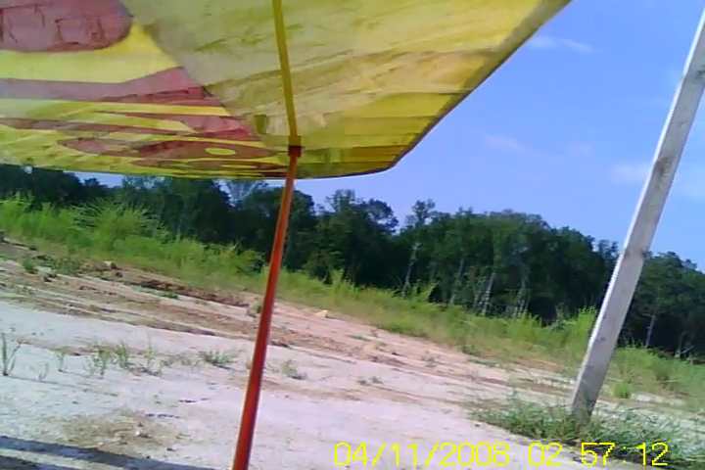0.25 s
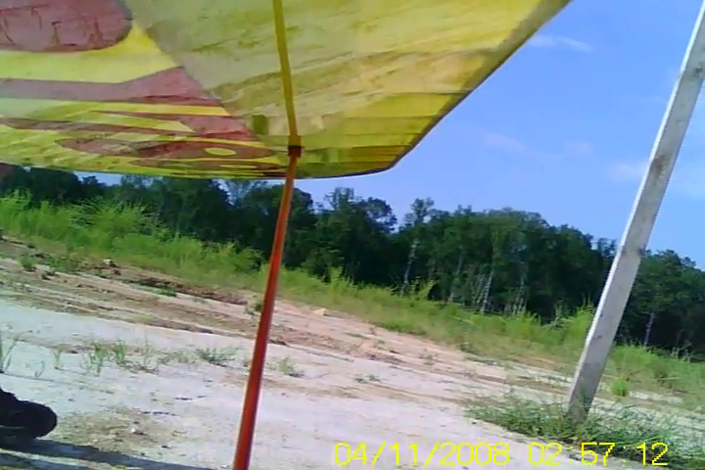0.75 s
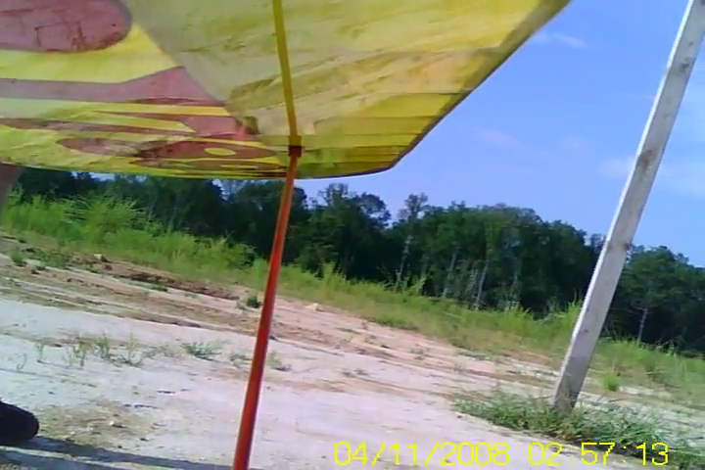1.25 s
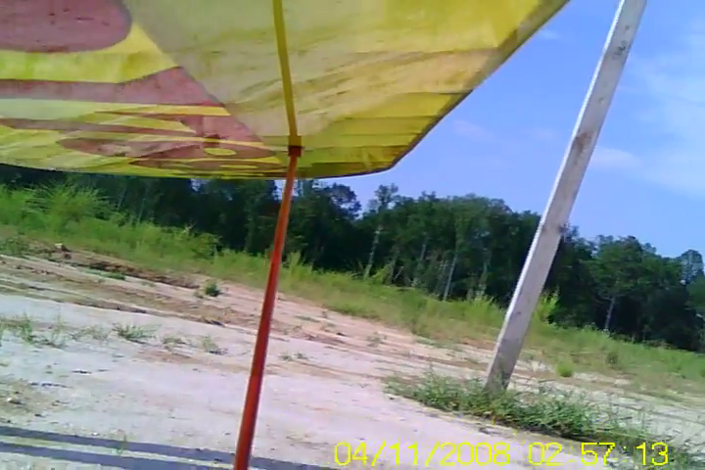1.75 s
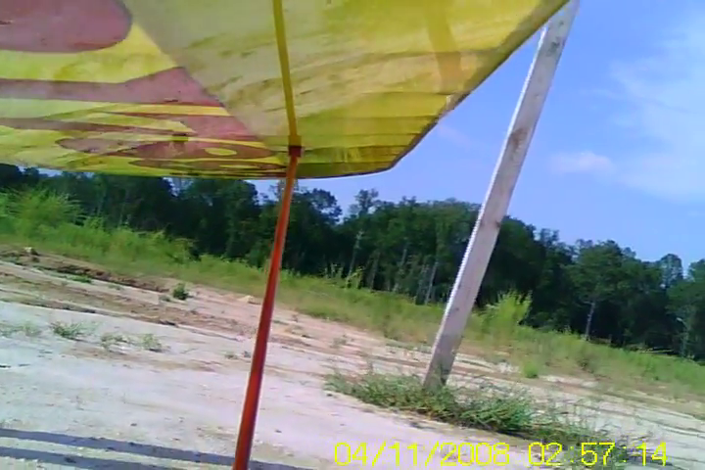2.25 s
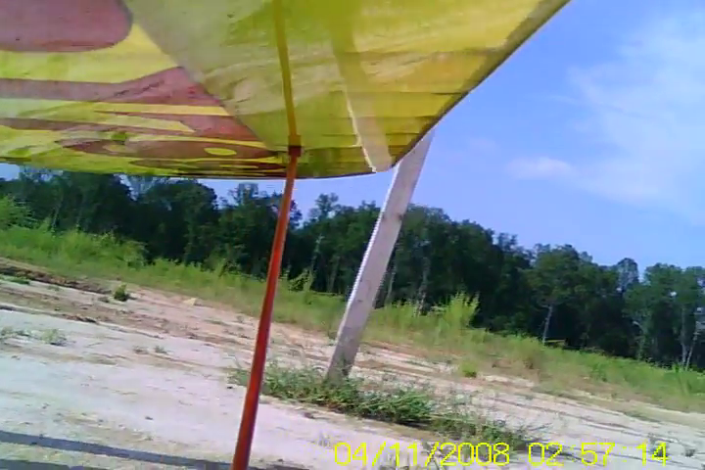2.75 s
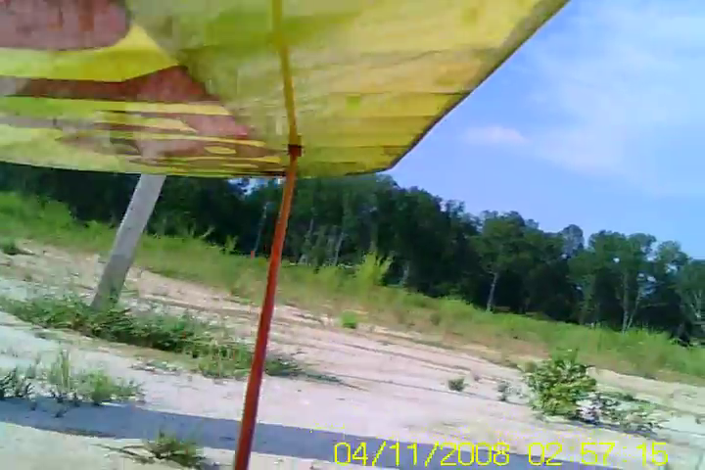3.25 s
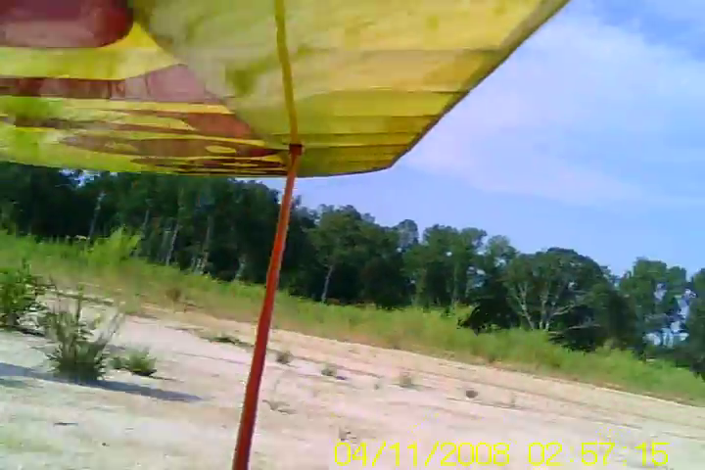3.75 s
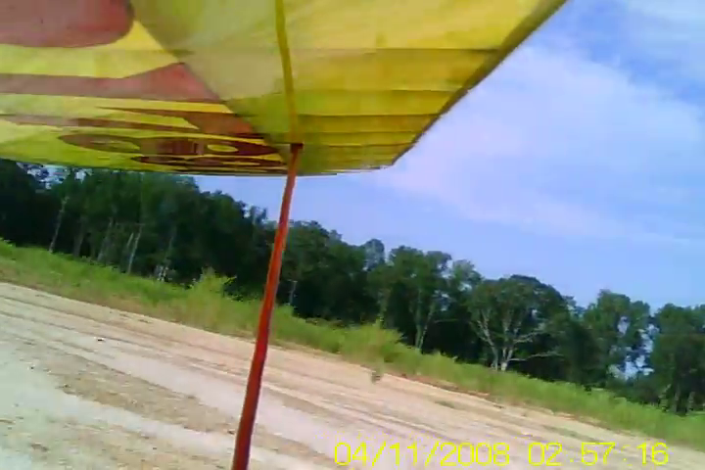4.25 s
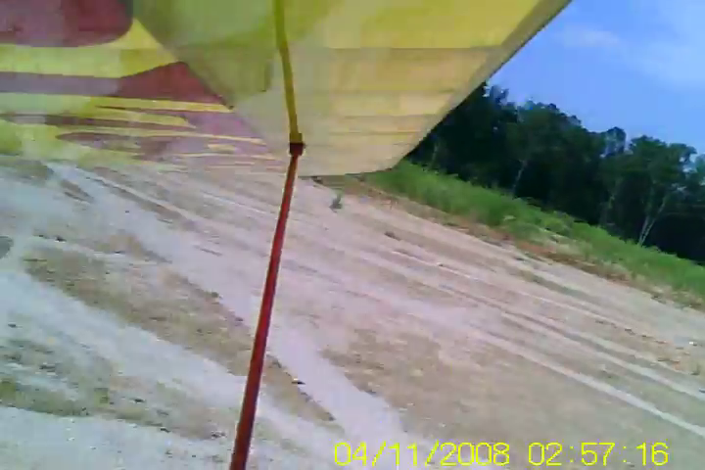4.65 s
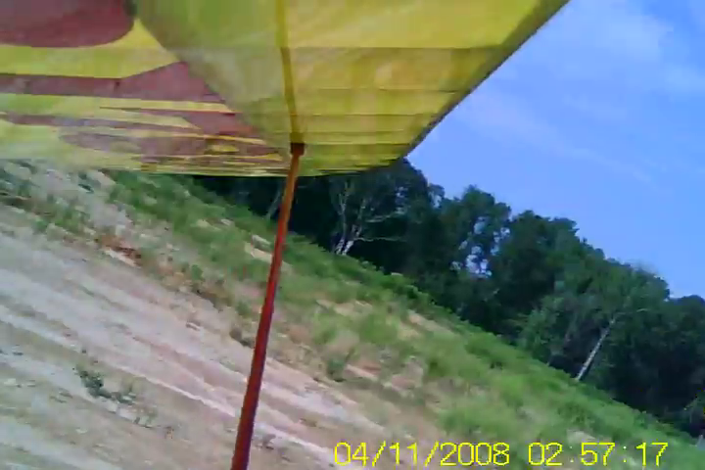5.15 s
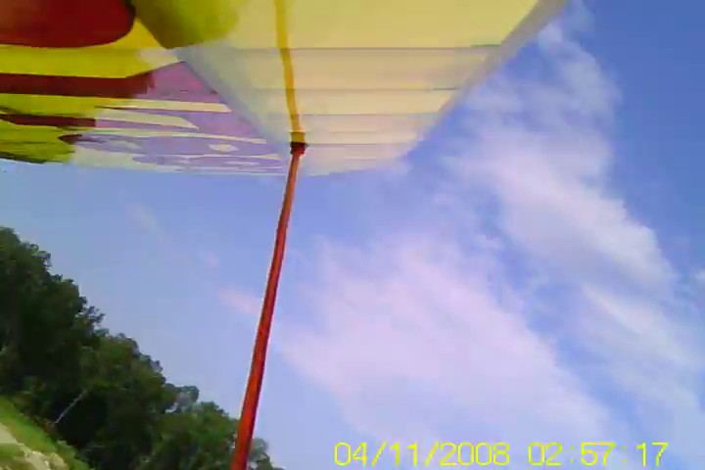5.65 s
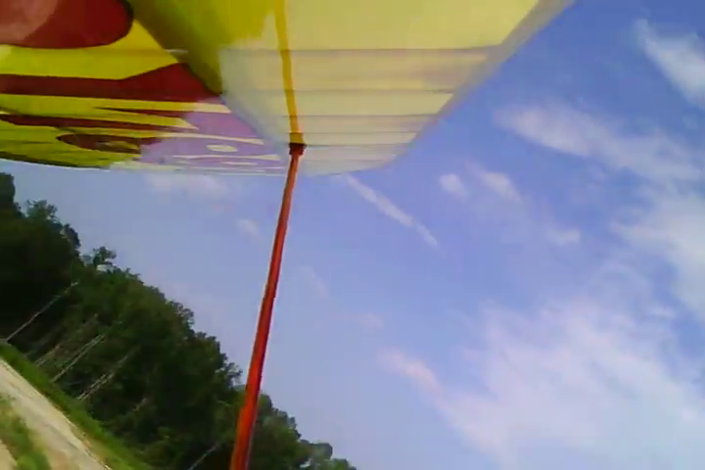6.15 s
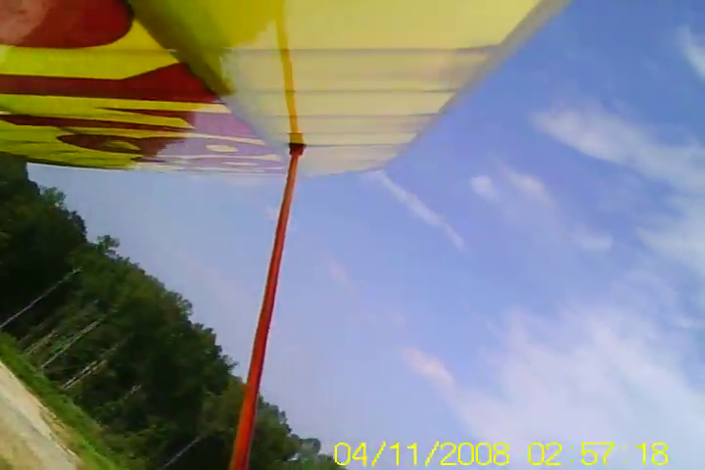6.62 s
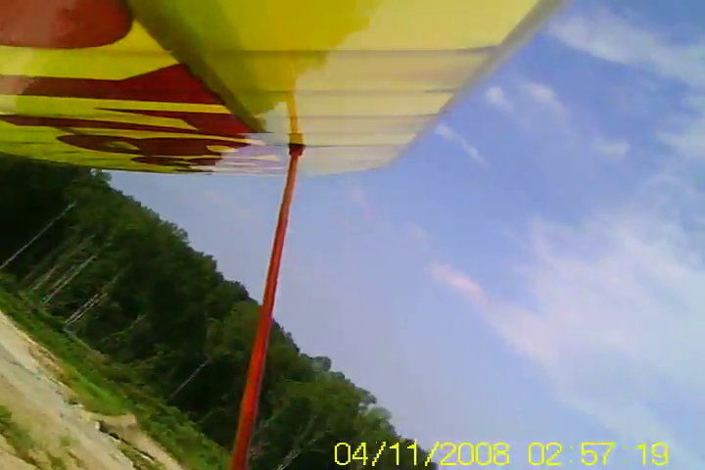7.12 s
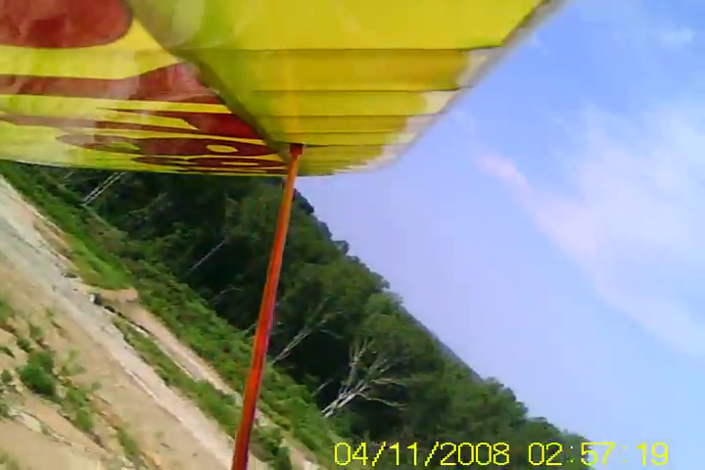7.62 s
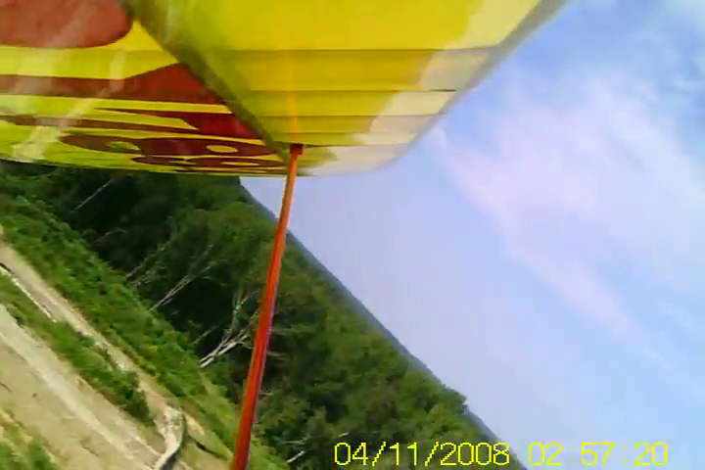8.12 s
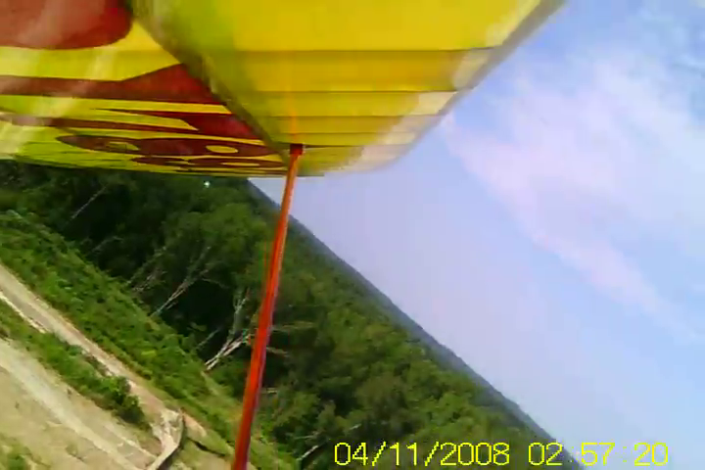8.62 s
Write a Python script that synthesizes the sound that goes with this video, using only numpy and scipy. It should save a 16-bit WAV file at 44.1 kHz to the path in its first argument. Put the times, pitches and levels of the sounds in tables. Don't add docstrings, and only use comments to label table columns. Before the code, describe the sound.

Small electric motor spins up in open air, very quiet at first with a high whine, rattle and peep. Wash from the propeller then buffets the close onboard microphone, with slaps, rumble and gliding squeals. After a short drop it builds to full throttle: dense distorted wind, thudding suction pops and a buzzing low hum, slightly softer and uneven towards the end.

```python
import sys
import numpy as np
from scipy import signal
from scipy.fft import rfft, irfft
from scipy.io import wavfile
from scipy.ndimage import uniform_filter1d

SR = 44100
rng = np.random.default_rng(int(sys.argv[2]) if len(sys.argv) > 2 else 0)


def int16_out(signal):
    q = np.round(np.clip(np.atleast_2d(signal).T, -1, 1) * 32767)
    wavfile.write(sys.argv[1], SR, q.astype(np.int16))


def boost_factor(decibels):
    exponent = np.asarray(decibels, float) / 20
    return 10 ** exponent


N = 391608
T = np.arange(N) / SR
F = np.fft.rfftfreq(N, 1 / SR) + 1e-3
FULL_POWER_S, HANDOVER_S = 3.14, 0.15


def curve(rows):
    s, *columns = np.transpose(rows)
    return [np.interp(T, s, c) for c in columns]


def shape(points):
    hz, db = np.transpose(points)
    return np.interp(np.log(F), np.log(hz), db, left=-120, right=-120)


def unit(x):
    return x / np.sqrt(np.mean(x ** 2))


def walk(rate):
    k = int(SR / rate)
    held = np.repeat(rng.standard_normal(N // k + 1), k)
    return unit(uniform_filter1d(uniform_filter1d(held, k), k)[:N])


def tone(hz):
    return np.sqrt(2) * np.sin(2 * np.pi * (np.cumsum(hz) / SR + rng.random()))


def noise(weight):
    return irfft(rfft(rng.standard_normal(N)) * weight, N)


WASH_HZ = [45, 420, 1500, 4500]
# f/Hz, level/dB per Hz
LOW_COLOUR = [(7.1, -41), (12, -14), (48, 0), (126, -2.5), (213, -6.5), (249, -7), (582, -13), (1590, -20),
              (2200, -38.5), (2860, -71), (4840, -120)]
# f/Hz, level/dB per Hz
PORT_COLOUR = [(1060, 6), (1800, 4), (2400, -7), (3040, -9.5), (3620, -10), (4860, -23.5), (6170, -17),
               (7180, -24), (7770, -23.5), (8680, -17.5), (10100, -28), (12000, -46.5), (15600, -79),
               (22000, -120)]
PORT_DB = -26
# f/Hz, level/dB
SLOW_AIR = [(45, -2), (90, -1.5), (150, -3), (300, -0.5), (500, 1.5), (800, 2.5), (1100, 1.5), (1600, -3.5),
            (2200, -2), (3500, 1), (9000, -0.5)]


def wash(eddy_db=1.98, own_db=0.2, knee_hz=350):
    colour = np.hypot(boost_factor(shape(LOW_COLOUR)), boost_factor(shape(PORT_COLOUR) + PORT_DB))
    spectrum = rfft(rng.standard_normal(N)) * colour
    levels = ranges()
    for k, (low, high) in enumerate([(18, 110), (250, 700), (1100, 2000), (2500, 7500)]):
        inside = (F > low) & (F < high)
        levels[k] -= 10 * np.log10(2 * np.sum(abs(spectrum[inside]) ** 2) / N ** 2)
    flicker = walk(90)
    part_power = np.clip((FULL_POWER_S - T) / .1, 0, 1)
    shared = eddy_db * walk(400) + bursts()
    shared += (0.64 + 0.4 * part_power) * turns()
    shared -= 10 * np.log10(np.mean(boost_factor(2 * shared)))
    air_hz, air_db = np.transpose(SLOW_AIR)
    out = 0
    for hz in 2 ** np.arange(3.5, 14, .5):
        window = np.cos(np.pi * np.clip(np.log2(F / hz), -.5, .5)) ** 2
        place = np.interp(np.log(hz), np.log(WASH_HZ), np.arange(4))
        k = min(int(place), 2)
        db = levels[k] + (place - k) * (levels[k + 1] - levels[k])
        db = db + shared * hz / (hz + knee_hz)
        db = db + own_db * np.roll(flicker, rng.integers(N))
        db = db + part_power * np.interp(np.log(hz), np.log(air_hz), air_db)
        out = out + boost_factor(db) * irfft(spectrum * window, N)
    return out


# t/s, flow level/dB
FLOW = [(0, -62), (.11, -68), (.14, -59), (.42, -51), (.5, -44), (.57, -31), (.74, -31), (1.33, -26.5),
        (1.7, -37.5), (2.3, -36.5), (2.45, -31), (2.75, -26), (3.17, -27), (3.27, -21), (4.5, -25.5),
        (5, -23), (7.4, -29), (8.88, -28.5)]
# flow/dB, rumble/dB, roar/dB, hiss/dB
WASH_LAW = [(-65.5, -59, -63, -70), (-57.5, -27, -41.5, -73), (-48, -44, -31, -53), (-35.5, -24, -27, -51),
            (-28.5, -19, -24, -43.5), (-21.5, -16, -20, -38)]
FULL_POWER_DB = [-0.5, 0, 0.5, 6]
SWELL_SHARE = [1, 0.095, 0.1, 0.067]


def ranges():
    flow = curve(FLOW)[0]
    at, *law = np.transpose(WASH_LAW)
    rumble, roar, hiss = (np.interp(flow, at, db) for db in law)
    full = np.clip((T - FULL_POWER_S) / HANDOVER_S, 0, 1)
    levels = np.array([rumble, roar, flow, hiss])
    return levels + np.outer(FULL_POWER_DB, full) + np.outer(SWELL_SHARE, swells())


# t/s, level/dB, half length/s
SWELLS = [(.17, -1.5, 0.098), (0.647, 2, 0.11), (1.116, 4, 0.069), (1.338, 6, .04), (1.636, -1.5, .1),
          (2.203, 5, 0.07), (2.45, -6.5, 0.15), (2.62, 3.5, 0.045), (2.737, 8.5, 0.016), (2.945, 4, 0.086),
          (3.276, 4, 0.077), (3.82, -3, 0.17), (4.06, -1, 0.17), (4.31, 0, 0.028), (4.475, -3, 0.043),
          (4.62, 1.5, 0.064), (4.8, -5, .06), (4.948, 4, 0.039), (5.119, -4, 0.057), (5.243, -0.5, .06),
          (5.487, -10, .18), (5.728, -1, 0.063), (6.08, -1, .08), (6.4, 1, 0.1), (6.565, 5.5, 0.043),
          (6.877, 6, 0.16), (7.12, 2, 0.07), (7.36, 6, 0.058), (7.57, 4.5, 0.052), (8.72, 2.5, 0.037)]


def swells():
    t = T[::64]
    swell = sum(db * np.exp(-((t - s) / half_s) ** 2) for s, db, half_s in SWELLS)
    return np.interp(T, t, swell)


def turns():
    hz = np.where(T < FULL_POWER_S, curve(SHAFT)[0], curve(BLADE)[0])
    return np.cos(2 * np.pi * np.cumsum(hz) / SR)


# t/s, peak level/dB, ring f/Hz
SLAPS = [(0.543, 1, 816), (0.891, -7, 681), (0.972, 2, 743), (1.06, 4, 670), (1.118, 7, 627),
         (1.184, 2, 1120), (1.211, 9, 646), (1.235, -1, 851), (1.262, 3, 1100), (1.29, 0, 1240),
         (1.309, 2, 1200), (1.337, 1, 724), (2.178, 0, 654), (2.397, 2, 670), (2.417, -1, 883),
         (2.722, 3.5, 1210), (2.884, 3, 1410), (3.425, 2.5, 1150), (4.117, -1, 680), (4.424, 2.5, 1220),
         (4.57, -20, 614), (4.587, 8, 672), (4.968, 3, 829), (6.393, -4, 644), (7.019, 4, 666),
         (7.254, 5, 880), (7.276, -4, 641), (7.335, -2, 802), (7.507, 2, 1520), (8.679, -4, 697)]


def slaps(t60=0.0077, trim_db=-3):
    out, t = np.zeros(N + 2048), np.arange(2048) / SR
    envelope = boost_factor(-60 * t / t60) * (1 - np.exp(-t / 0.00072))
    for s, db, hz in SLAPS:
        i = int(s * SR)
        out[i:i + 2048] -= boost_factor(db + trim_db) * np.sin(2 * np.pi * hz * t) * envelope
    return out[:N]


def bursts(rise_s=0.0011, fall_s=0.0035, share=0.26):
    kicks, t = np.zeros(N), np.arange(2048) / SR
    s, db, _ = np.transpose(SLAPS)
    kicks[(s * SR).astype(int)] = share * np.clip(db + 24, 0, 30)
    swell = np.exp(-t / fall_s) * (1 - np.exp(-t / rise_s))
    return signal.fftconvolve(kicks, swell)[:N]


# t/s, peak level/dB
DIPS = [(2.73, -5), (3.046, -2), (3.3035, -3.5), (3.36, -3), (3.4036, 4), (3.546, 0), (3.5707, -2.5),
        (4.191, 1), (4.2433, -4.5), (4.2597, 1.5), (4.4248, -3), (4.518, 1.5), (4.6414, -2.5), (4.6548, -2),
        (4.6867, -2), (4.936, -15), (4.9548, -1), (4.969, -5), (5.127, 0), (6.1899, 1.5), (6.2747, -6),
        (6.8001, -2), (6.832, -8), (6.8809, -5), (7.1447, -2), (7.1673, 2), (7.2553, 3), (7.481, -1),
        (7.5737, -7), (8.0811, 1)]
SMALL_DIPS, SMALL_DIP_DB = 22, -8


def dips(width_s=.0011, trim_db=-4.0):
    kicks, t = np.zeros(N), np.arange(-512, 513) / SR
    s, db = np.transpose(DIPS)
    kicks[(s * SR).astype(int)] = boost_factor(db + trim_db)
    place, size = rng.random((SMALL_DIPS, 2)).T
    start = FULL_POWER_S * SR
    kicks[(start + place * (N - start)).astype(int)] = boost_factor(SMALL_DIP_DB - 3 * size + trim_db)
    pulse = 1.32 * np.exp(-(t / width_s) ** 2) - 0.37 * np.exp(-(t / (3 * width_s)) ** 2)
    return -signal.fftconvolve(kicks, pulse, "same")


# t/s, f/Hz, level/dB
BLADE = [(3.15, 121.3, -56), (3.3, 128.8, -16), (4, 128.2, -17), (4.5, 127.5, -21), (4.95, 125.3, -16.5),
         (5.4, 125.3, -23.5), (6.2, 126.4, -20.5), (7, 125.1, -20), (7.5, 125.1, -21), (7.9, 126.5, -29),
         (8.88, 125.2, -29.5)]
# multiple, level/dB
BLADE_ORDERS = [
    (.5, -17),
    (1, -6),
    (2, -14),
    (3, -18),
]


def blades():
    hz, db = curve(BLADE)
    hz = hz * (1 + 0.01614 * walk(25))
    beats = sum(boost_factor(order_db + 3.16 * walk(22)) * tone(k * hz) for k, order_db in BLADE_ORDERS)
    return boost_factor(db) * beats * (T > BLADE[0][0])


# t/s, f/Hz
SHAFT = [(0, 15.6), (.45, 21.5), (.55, 28), (.75, 30), (.95, 31.3), (1.1, 35.4), (1.2, 37), (1.35, 33.8),
         (1.55, 28.3), (1.8, 26.2), (2.25, 25.8), (2.4, 31), (2.6, 32.7), (2.75, 41), (3, 43.2), (3.25, 44)]
# shaft f/Hz, shake level/dB, drive whine level/dB
MOTOR_LAW = [(15.6, -53, -63), (22.5, -38, -55), (26.2, -27.5, -56.5), (28.8, -19.5, -55.5),
             (35.6, -18, -56), (40.2, -20, -52), (41.7, -32, -64), (44, -35, -67)]
# shaft order, best shaft f/Hz, range/Hz
ORDERS = [(57, 30.7, 2.4), (20.3, 30, 12), (29, 27, 3), (33, 26, 1.5), (4, 24, 8), (-28, 26, 1.5),
          (-43, 31, 2.5), (17.3, 19, 3), (22.5, 16, 3), (-17.3, 17, 3), (-24.5, 18, 3), (49, 30, 1.5)]
SIDEBAND_DB = [-6, -9, -15, -15, -17, -17, -11, -8, -9, -13, -14, -17]
DRIVE_HZ, HANDOVER_DB, SHAKE_SWELL_SHARE = 8031, -30, 0.65


def motor():
    on = T < FULL_POWER_S + HANDOVER_S
    speed = curve(SHAFT)[0]
    at, *law = np.transpose(MOTOR_LAW)
    gone_db = HANDOVER_DB * np.clip((T[on] - FULL_POWER_S) / HANDOVER_S, 0, 1)
    shake_db, whine_db = (np.interp(speed[on], at, db) + gone_db for db in law)
    shake_db += SHAKE_SWELL_SHARE * swells()[on]
    hz = (speed * (1 + .001 * walk(20)))[on]
    shake = tone(hz * (1 + 0.05 * walk(7.7)[on])) + boost_factor(-8.0) * tone(2 * hz)
    shake *= boost_factor(shake_db + 2 * walk(9.9)[on])
    whine = tone(DRIVE_HZ + 2.5 * walk(30)[on])
    flicker = walk(8.7)[on]
    for (order, best_hz, range_hz), db in zip(ORDERS, SIDEBAND_DB):
        patchy_db = 2 * np.roll(flicker, rng.integers(N))
        patchy_db -= 4.3 * ((hz - best_hz) / range_hz) ** 2
        whine += boost_factor(db + patchy_db) * tone(DRIVE_HZ + order * hz)
    whine *= boost_factor(whine_db + 0.51 * walk(30.1)[on])
    return np.pad(shake + whine, (0, N - on.sum()))


# t/s, length/s, from f/Hz, to f/Hz, level/dB on the frame resonance
SQUEALS = [
    (.19, .24, 2700, 3110, -56),
    (.43, .09, 3040, 3150, -52),
    (.96, .17, 2815, 2975, -40),
    (1.116, .095, 2962, 3240, -41),
    (1.26, .08, 3180, 2950, -51),
    (2.6, .065, 2830, 3220, -38),
    (2.82, .29, 2915, 2955, -44),
    (.17, .06, 4300, 4320, -66),
]
FRAME_HZ = [3040, 4310]
FRAME_WIDTH_HZ, SQUEAL_WAVER_DB = 120, 1.5


def squeals():
    out, waver = np.zeros(N), walk(60)
    for s, length, from_hz, to_hz, db in SQUEALS:
        fade = np.clip(np.minimum(T - s, s + length - T) / 0.014, 0, 1)
        on = fade > 0
        hz = from_hz + (to_hz - from_hz) * (T[on] - s) / length
        off = np.min([abs(hz - f) for f in FRAME_HZ], axis=0) / FRAME_WIDTH_HZ
        level_db = db - 15 * np.log10(1 + off ** 2) + SQUEAL_WAVER_DB * waver[on]
        out[on] += fade[on] * boost_factor(level_db) * tone(hz + 16 * np.roll(waver, 999)[on])
    return out


# f/Hz, width/Hz, level/dB,
# fading by t/s, patchiness/dB
RATTLE = [(1010, 130, -56, .6, 4.0), (800, 100, -59, .5, 4.0), (1850, 160, -62, .6, 5.0),
          (2040, 110, -59, 3.0, 3.0), (3080, 170, -65, .7, 3.5), (6400, 350, -70, .7, 4.5),
          (8400, 500, -61, 4.9, 1.0)]


def rattle():
    out = 0
    for hz, width, db, end, patchy_db in RATTLE:
        ring = unit(noise(1 / (1 + (2 * (F - hz) / width) ** 4)))
        out = out + boost_factor(db + patchy_db * walk(58.6) - 20 * (T / end) ** 4) * ring
    return out


# f/Hz, level/dB per Hz
FIELD = [(40, -12), (180, -14), (260, -20), (345, 3), (480, -14), (700, -29), (1600, -13), (2500, -20.5),
         (3600, -24), (4900, -37), (6400, -29), (7300, -36), (9000, -32), (11500, -71)]
FIELD_DB = -48.5


def field():
    return boost_factor(FIELD_DB + 1.8 * walk(22)) * unit(noise(boost_factor(shape(FIELD))))


def scene():
    air = wash() + slaps() + dips() + blades()
    machine = motor() + squeals() + rattle()
    return (air + machine + field())[None]


# t/s, level/dB
GAIN_STEPS = [
    (1.345, -2.5),
    (2.752, -3),
    (4.98, -3),
    (7.6, -1.5),
]
GAIN_RECOVERY_S = 0.95


def camera_gain():
    return sum(db * (T > s) * np.exp(-abs(T - s) / GAIN_RECOVERY_S) for s, db in GAIN_STEPS)


def low_pass(x):
    return signal.sosfilt(signal.butter(12, 15680, fs=SR, output="sos"), x)


# t/s, share of squared pressure
SUCTION = [(0, -.25), (1, -.15), (2, .05), (4, .1), (8.88, .15)]
# t/s, level/V
OFFSET = [(0, -.0158), (4, -.0118), (8.88, -.0103)]
CAMERA_CEILING, CEILING = .765, .71


def record(dry):
    dry = dry * boost_factor(uniform_filter1d(camera_gain(), size=512))
    square = dry ** 2
    x = dry - curve(SUCTION)[0] * (square - uniform_filter1d(square, size=8192))
    x = x + curve(OFFSET)[0]
    x = signal.sosfilt(signal.butter(8, 11800, fs=SR, output="sos"), x)
    x = np.clip(x, -CAMERA_CEILING, CAMERA_CEILING)
    x = signal.sosfilt(signal.ellip(10, .5, 60, 12150, fs=SR, output="sos"), x)
    mix = np.clip(x, -CEILING, CEILING)
    return low_pass(mix)


dry = scene()
out = record(dry)
int16_out(out)
```